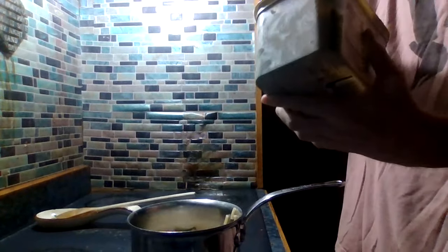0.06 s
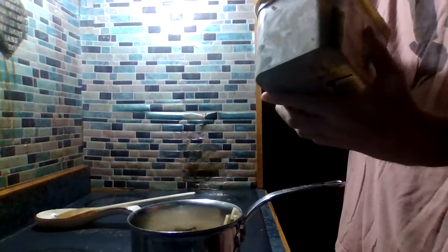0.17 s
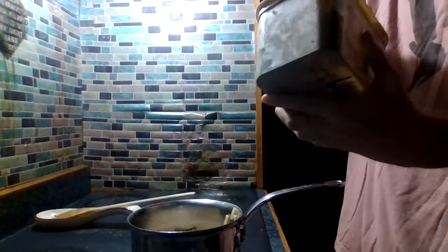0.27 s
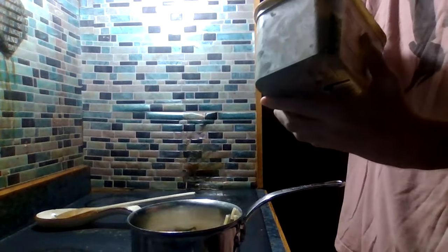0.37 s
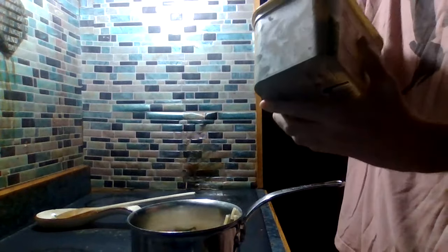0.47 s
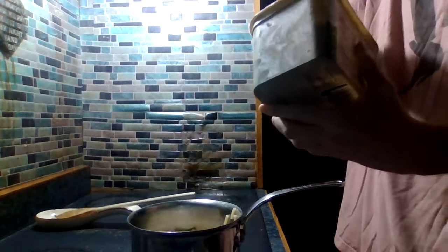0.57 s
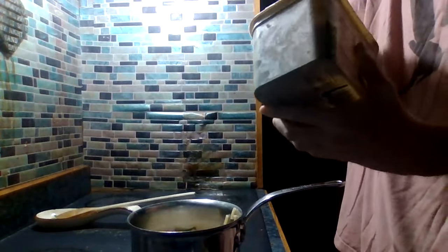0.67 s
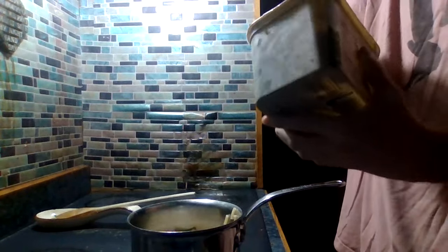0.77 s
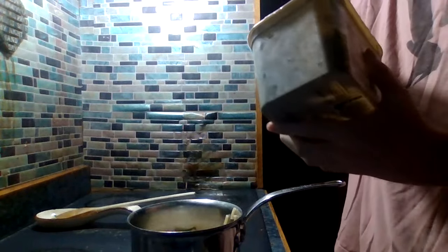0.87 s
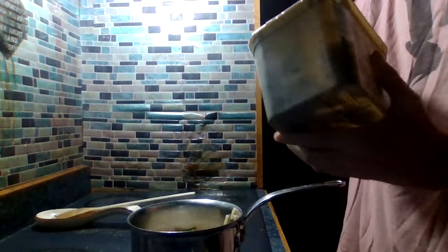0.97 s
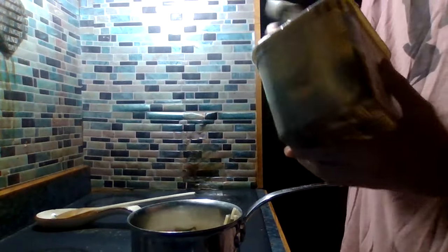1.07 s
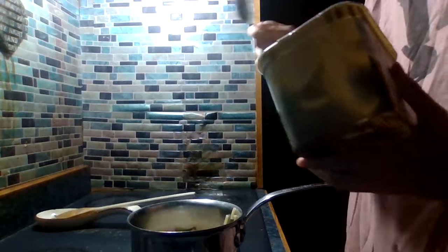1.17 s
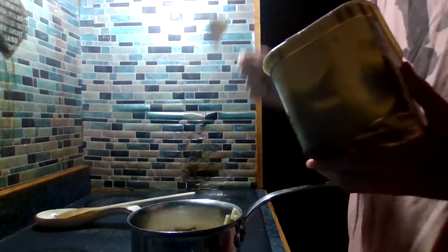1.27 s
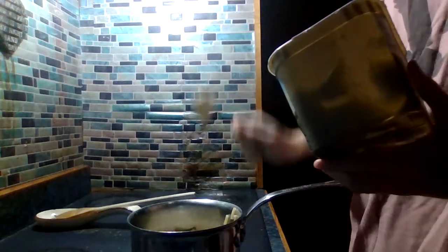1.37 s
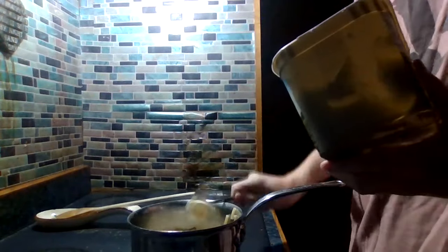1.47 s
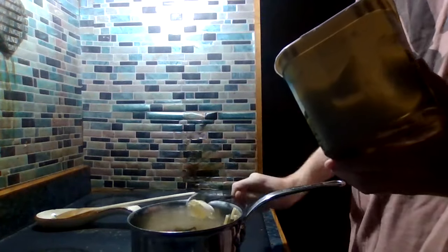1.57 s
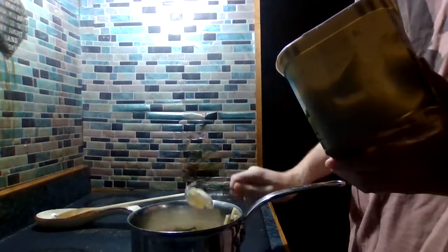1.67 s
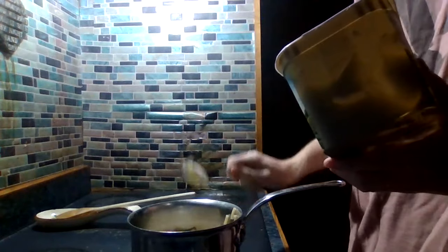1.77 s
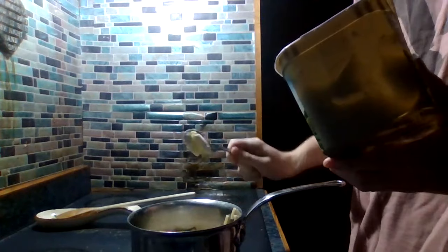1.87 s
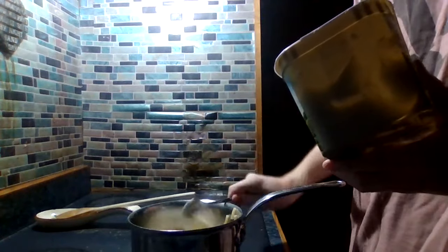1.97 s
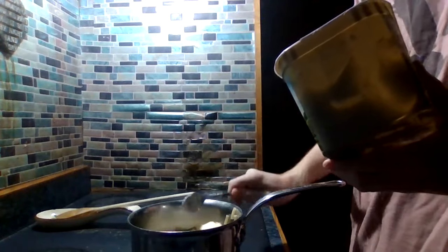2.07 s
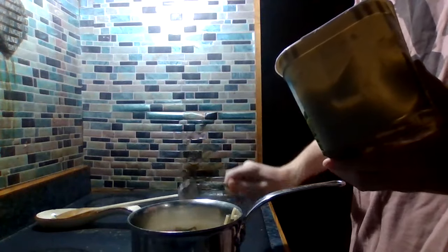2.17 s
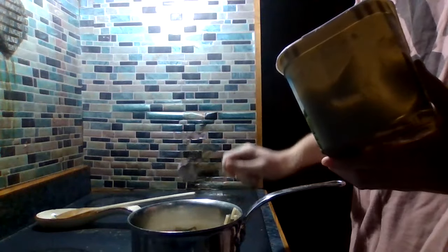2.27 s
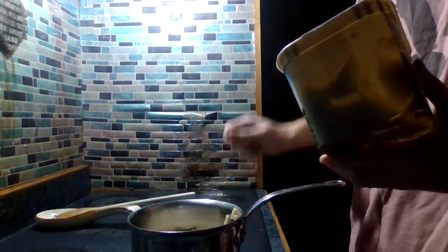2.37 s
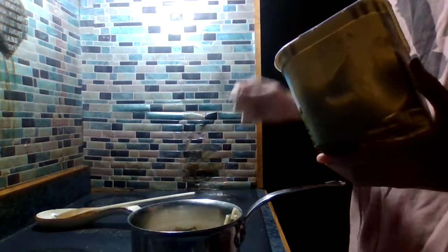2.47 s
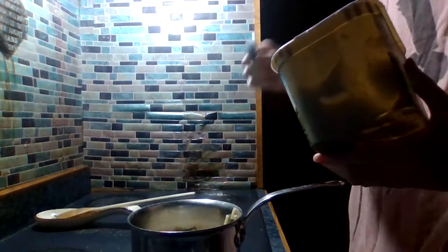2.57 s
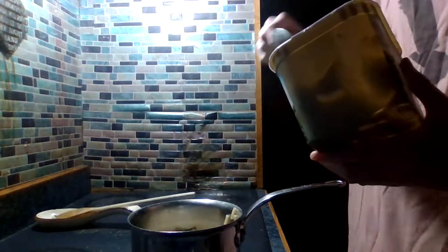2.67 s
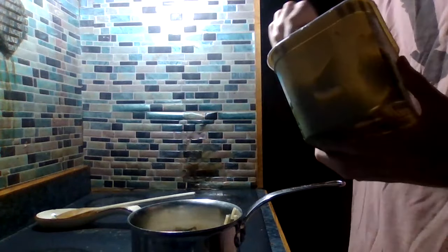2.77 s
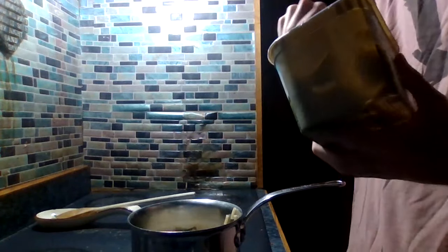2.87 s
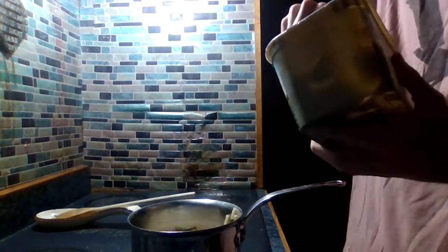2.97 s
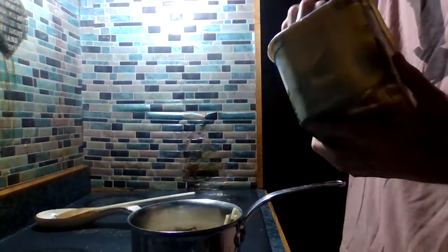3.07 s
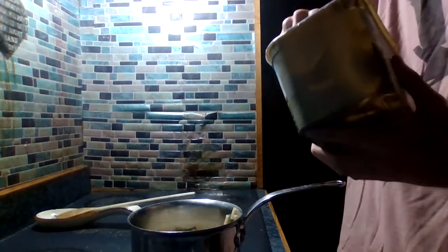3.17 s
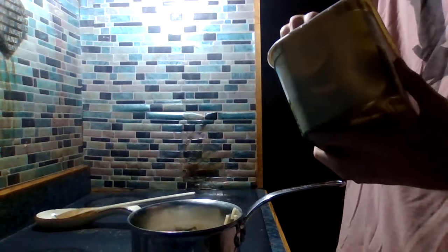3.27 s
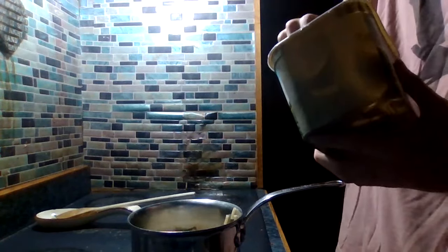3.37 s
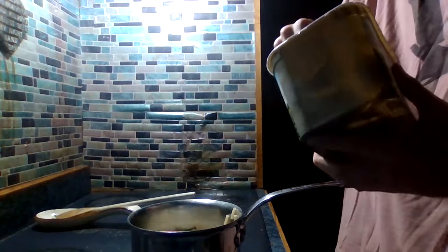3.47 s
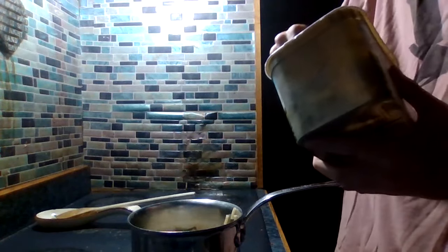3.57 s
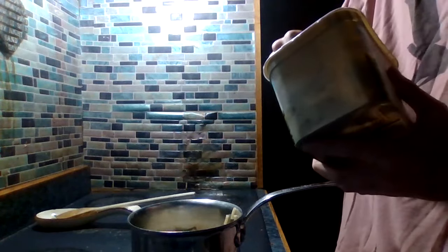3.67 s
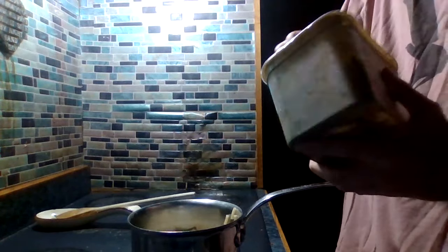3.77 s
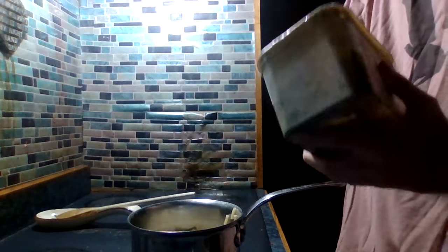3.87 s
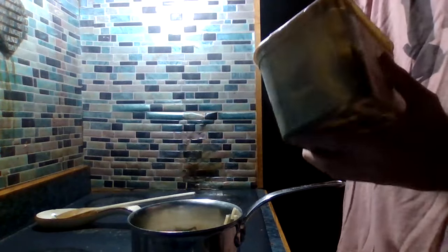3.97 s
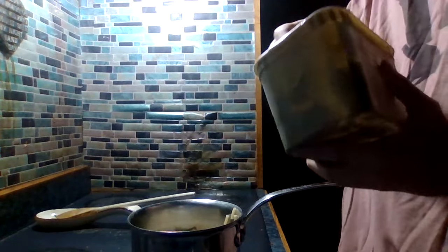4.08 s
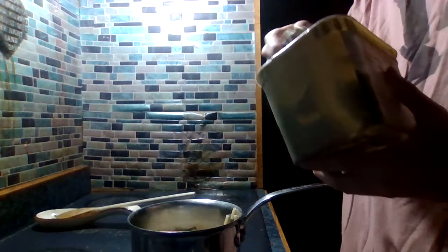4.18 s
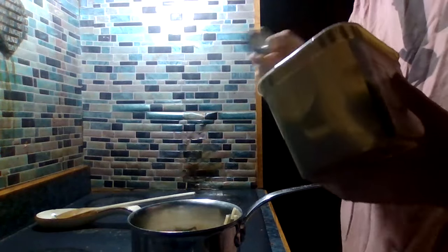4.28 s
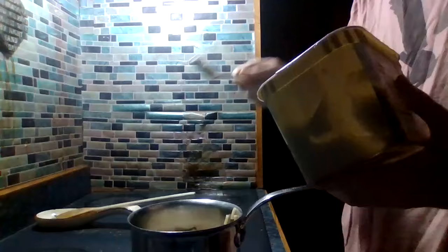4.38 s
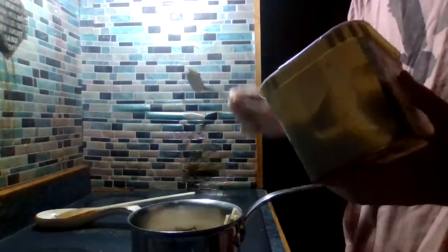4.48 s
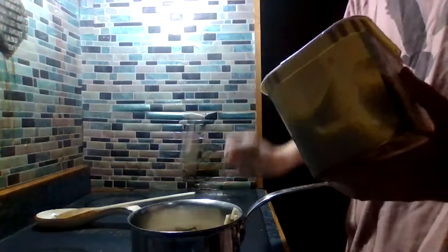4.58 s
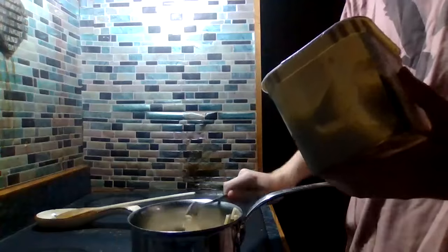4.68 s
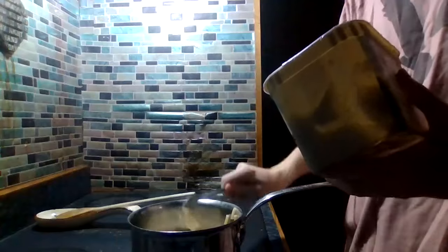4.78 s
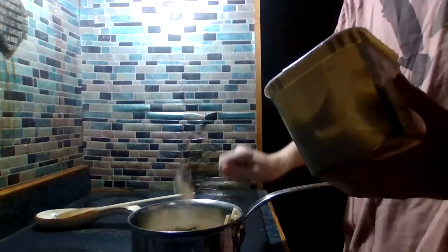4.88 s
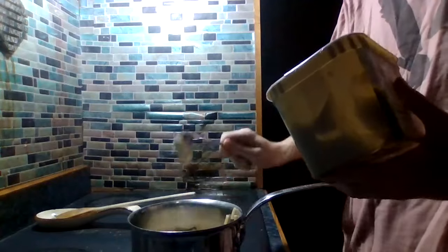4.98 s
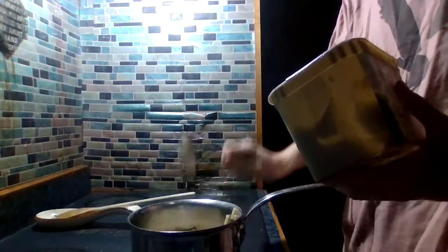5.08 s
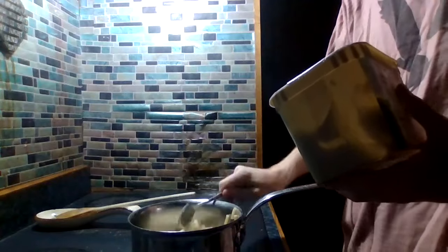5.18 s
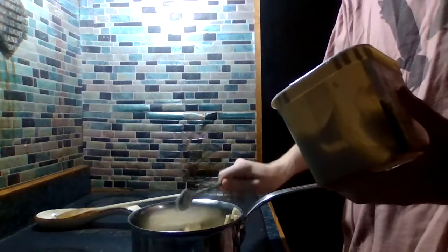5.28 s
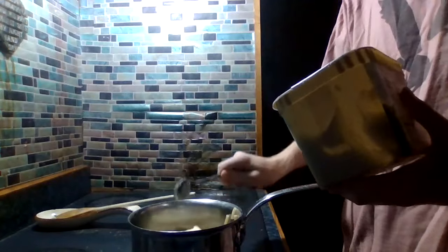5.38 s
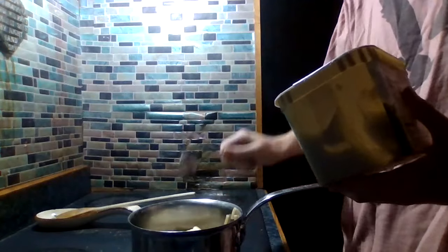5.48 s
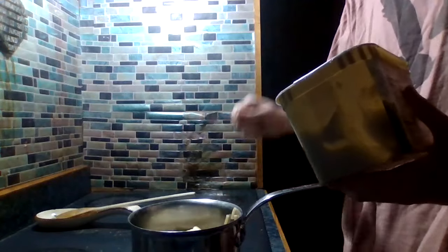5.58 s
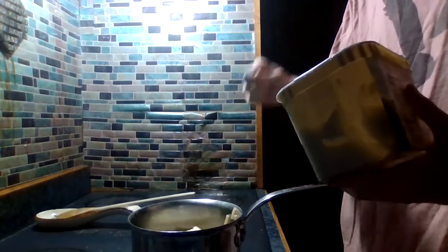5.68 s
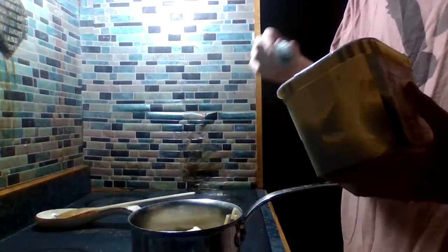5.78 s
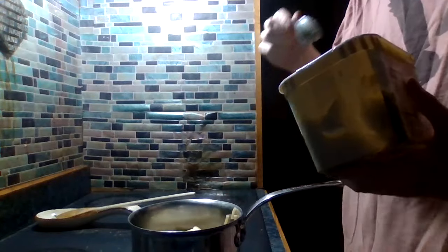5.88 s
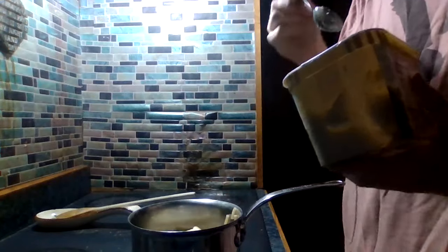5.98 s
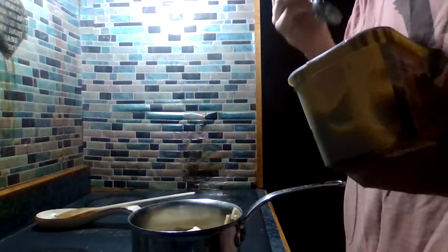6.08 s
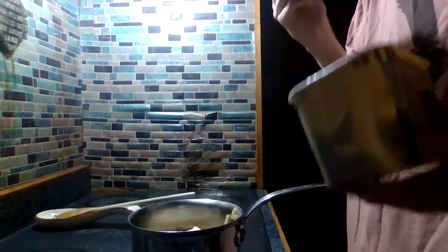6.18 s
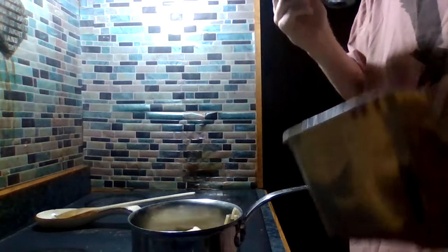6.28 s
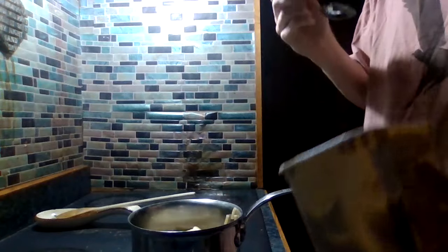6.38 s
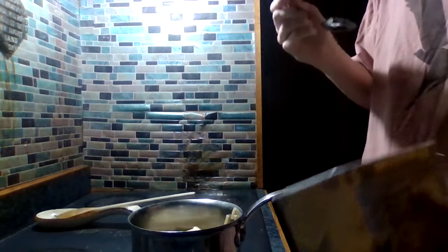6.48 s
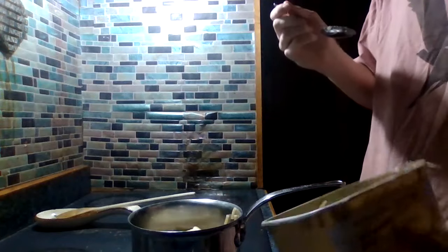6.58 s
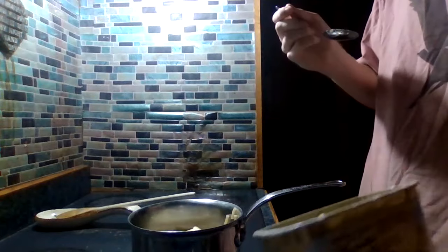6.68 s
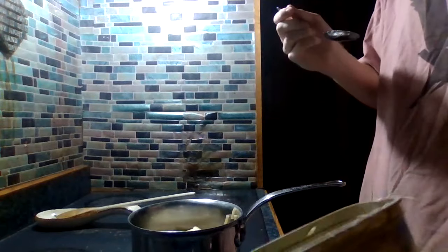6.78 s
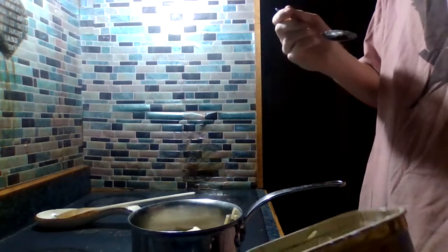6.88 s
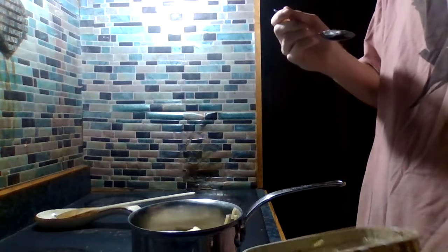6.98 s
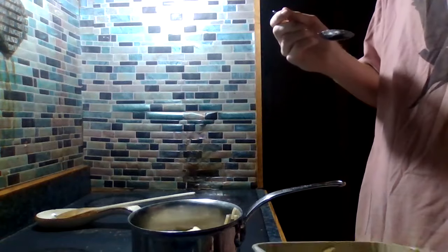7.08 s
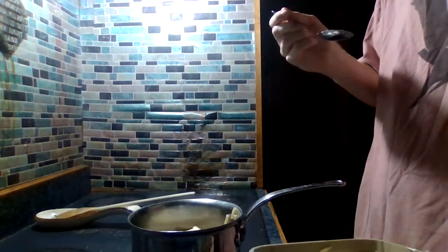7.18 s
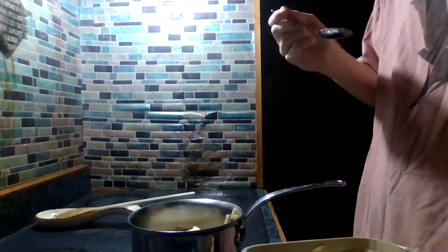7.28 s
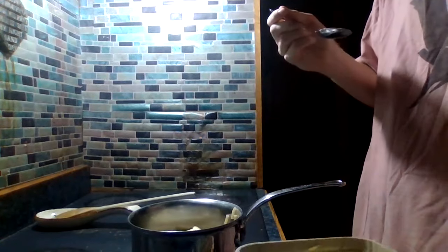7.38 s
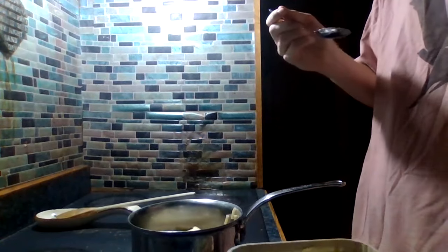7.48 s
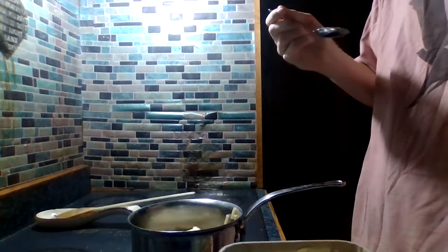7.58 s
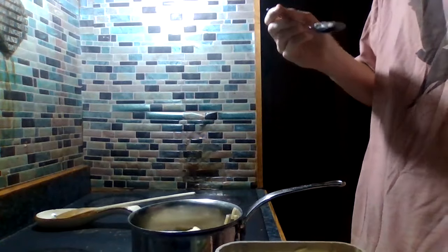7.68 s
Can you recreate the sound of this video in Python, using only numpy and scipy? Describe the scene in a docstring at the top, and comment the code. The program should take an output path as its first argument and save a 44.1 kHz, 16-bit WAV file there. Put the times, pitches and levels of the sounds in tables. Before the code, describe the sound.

A low rumble and hum run throughout in a small kitchen. During the first second a spoon scrapes faintly in a plastic tub, with one light tap. At about 1.5 and 2 seconds the steel spoon raps on the rim of a full saucepan: sharp, bright clanks with a short ring and a dull thud beneath, close enough to overload the microphone slightly. From 2.7 to 3.8 seconds come soft plastic knocks and brief scrapes, with a small damped clink at 3.5 seconds. Two more raps on the pan, louder than the first pair, ring out at 4.6 and 5.1 seconds. After a lull and a faint tap, the tub is set down on the counter with a hollow thud at 6.8 seconds and a sharper knock at 7.2. Light bumps and rubbing follow as it is pushed about, until around 7.7 seconds.

```python
"""Spoon, butter tub and saucepan

A steel spoon scrapes and knocks butter out of a plastic tub and is rapped four times on the rim of a full
steel saucepan, exciting crowds of metal modes hard enough to overload the microphones. Later the tub is
set down and pushed about on the counter. A small tiled kitchen reverberates over a low rumble and hum."""
import sys
import numpy as np
from scipy import signal
from scipy.fft import rfft, irfft, next_fast_len
from scipy.io import wavfile

SR = 44100
rng = np.random.default_rng(int(sys.argv[2]) if len(sys.argv) > 2 else 0)


def master(y):
    """Save y as 16-bit WAV."""
    cut = np.clip(np.atleast_2d(y).T, -1, 1)
    pcm = np.round(cut * 32767)  # scale
    wavfile.write(sys.argv[1], SR, pcm.astype(np.int16))


N = 340893

# rumble and hiss of the room: (frequency [Hz], relative spectral level [dB])
ROOM_SPECTRUM = [(12, -28.5), (20, 7.5), (32, 0), (91, -15), (107, -25.5), (170, -16), (229, -16.5),
                 (263, -28.5), (354, -24), (546, -33), (680, -30.5), (1330, -36), (4000, -43),
                 (9000, -47.5), (16000, -45.5)]
# humps of hum on that spectrum: (centre [Hz], width [Hz], height [dB])
HUM_PEAKS = [(41, 6.8, 5), (169.6, 16, 9.5), (351, 37, 5), (504, 73, 7)]
# spoon, fingers and tub rubbing:
# (peak time [s], hold [s], level [dB], rise [dB/s], fall [dB/s], tub body over surface [dB])
RUB_STROKES = [(0.0, 0.043, -52, 910, 350, -6), (0.5, .015, -55, 600, 204, -5),
               (0.548, .004, -45, 300, 350, -18), (0.69, .17, -53.5, 200, 450, -4),
               (2.74, 0.027, -59, 1500, 300, -6), (2.942, .005, -57.5, 900, 252, 2),
               (3.736, 0.0017, -28, 550, 800, -30), (3.7, 0.033, -56.5, 300, 300, 6),
               (3.8, .01, -44, 900, 250, -8), (4.215, .05, -75, 900, 250, -13),
               (4.424, .015, -61, 300, 450, -13), (6.624, 0.0048, -56, 250, 200, -8),
               (6.745, 0.15, -61, 700, 400, -10), (6.9, .005, -45, 1504.5, 232, 0),
               (7.07, 0.012, -56.5, 1500, 504, 8), (7.21, 0.0092, -69, 902, 200, 12),
               (7.28, 0.043, -64.5, 150, 197, 13), (7.35, 0.017, -61, 300, 499, 7),
               (7.4, 0.029, -51, 300, 300, -2), (7.48, 0.015, -53, 900, 200, -4),
               (7.565, 0.0071, -49, 200, 250, -1), (7.62, 0.072, -54, 200, 248, -10)]
# friction at the surfaces: (frequency [Hz], relative spectral level [dB])
FRICTION_SPECTRUM = [(1470, -39), (2500, -19), (3600, -10.5), (4310, -13.5), (4950, -8), (6760, -9.5),
                     (7360, -15), (16000, -5.5)]
# knocks on the tub: (time [s], body [dB], counter boom [dB], click [dB], contact cutoff [Hz],
# decay time factor [1])
TUB_KNOCKS = [(0.728, -41, -56, -46, 2520, 0.97), (2.739, -46.5, -80, -50, 1470, 0.66),
              (2.919, -44.5, -61, -74, 2000, 0.67), (3.113, -31.5, -47.5, -39.5, 1820, 0.58),
              (3.328, -69, -70, -53, 1470, .5), (3.513, -40.5, -64, -55, 2030, 1.7),
              (3.767, -26.5, -43, -37, 2900, 0.56), (3.782, -25.5, -54, -23, 2200, 0.83),
              (6.252, -42.5, -53, -55, 1760, 0.43), (6.816, -8, -31.5, -40, 903, 0.49),
              (6.849, -29.5, -43, -53, 1010, 1.7), (6.898, -43, -60, -38, 1000, 1.2),
              (7.078, -25, -35, -55, 890, 0.74), (7.170, -12, -29, -20, 3600, 0.36),
              (7.455, -22.5, -38, -26.5, 1880, 0.57), (7.556, -36.5, -44.5, -69, 2500, 0.81),
              (7.65, -48, -56, -41, 2000, 0.55), (7.716, -41, -60, -43, 2500, 0.68)]
# spoon on rim, with relative levels: (time [s], spoon [dB], upper bowl mode [dB], pan wall [dB],
# pan rim [dB], left bias jolt [1], right bias jolt [1])
RIM_RAPS = [(1.4815, -27, -34.5, -15, -19, 0.8, 0.24), (1.971, -21, -31, -12, -13.5, 0.05, 0.42),
            (4.631, -21.5, -18, -6.5, -15.5, 0.23, 0.57), (5.13, -18, -12, -6, -11.5, 0.39, 0.63)]

# clusters of close modes: (centre [Hz], width [Hz], relative level [dB], nominal t60 [s])
TUB_MODES = [(433, 360, 5, 0.19), (784, 200, 0.5, 0.17), (1270, 200, -11, 0.17), (2050, 1640, 0, 0.22),
             (2665, 950, 1.5, 0.046), (4540, 6300, 12, 0.091)]
COUNTER_MODES = [(59, 25, 6.5, 0.2), (129, 74, 1, 0.46)]
SPOON_BOWL_MODES = [(2020, 110, 0, .33), (2170, 460, 1, .31)]
UPPER_BOWL_MODES = [(2322, 75, 0, .37)]   # ring freely only when little butter clings to the spoon
SPOON_NECK_MODES = [(3385, 170, -8, .38), (4020, 440, -1.5, 0.38)]
SPOON_LONE_MODES = [(3768, 15, -12, .52), (5822, 30, -4, .3), (6100, 30, -2, .4), (6176, 25, -5, .37),
                    (6650, 50, -8, .35), (7320, 35, -8, .3), (8120, 35, -9, .25), (10160, 35, -11, .24)]   # narrow enough to stand out as beating tones
PAN_WALL_MODES = [(5080, 1000, -12, 0.41), (5610, 440, -3, 0.15), (6100, 680, -5.5, 0.44)]
PAN_RIM_MODES = [(6880, 890, -3.5, 0.37), (7380, 790, -3, .34), (8230, 380, -7.5, .3)]
PAN_EDGE_MODES = [(13400, 1200, -7, .22), (14600, 1300, -3, .2), (15500, 600, -3, .21)]
SHIMMER_MODES = [(9680, 1600, -3.5, 0.3), (11300, 1500, 2, 0.27)]   # high ringing of pan and spoon
THUD_MODES = [(91, 130, -1, 0.1), (302, 280, -2.5, 0.32), (468, 240, -1.5, 0.24), (877, 310, -1.5, 0.13),
              (1550, 240, 2, 0.042)]   # the full pan on the hob
CLINK_MODES = [(2820, 970, 4.5, 0.055), (3200, 260, -9, 0.16), (4010, 680, 3, 0.055), (3940, 140, -11, 0.2),
               (5670, 1100, -2.5, 0.068), (7150, 860, 1.5, 0.077), (9600, 4000, -5, 0.046),
               (12000, 1600, 0, 0.08), (15400, 900, -2, 0.1)]   # the spoon, damped by the hand

# likeness of the sound field at left and right: (frequency [Hz], correlation [1])
COHERENCE = [(60, 0.98), (380, 0.97), (950, 0.82), (2400, 0.033), (6000, 0.02), (15000, 0.022)]
# reverberation of the kitchen: (frequency [Hz], t60 [s])
REVERB_TIMES = [(100, 0.35), (500, .33), (2000, 0.26), (8000, .3), (16000, 0.39)]


def amp(db):
    """Amplitude ratio of a level in decibels."""
    return 10 ** (np.asarray(db) / 20)


def unit_rms(x):
    """Normalisation to unit mean power."""
    return x / np.sqrt(np.mean(x ** 2) + 1e-20)


def at_hz(points, hz):
    """Interpolation of a table on a logarithmic frequency axis."""
    frequencies, values = np.array(points).T
    return np.interp(np.log(np.maximum(hz, 1)), np.log(frequencies), values)


def decay(t, t60):
    """Exponential damping: 60 dB down after t60 seconds."""
    return np.exp(-np.log(1000) * t / np.maximum(t60, 1e-3))


def add(out, start_s, sound):
    """Superposition: a sound joins the mix at start_s."""
    i = round(start_s * SR)
    out[..., i:i + sound.shape[-1]] += sound[..., :N - i]


def stereo_noise(size, gain):
    """Partial coherence: noise coloured by gain(hz), alike at both sides only at low frequencies."""
    padded = next_fast_len(size, True)
    hz = np.arange(padded // 2 + 1) * SR / padded
    mid, side = rfft(rng.standard_normal((2, padded)))
    alike = at_hz(COHERENCE, hz)
    spectrum = np.sqrt(1 + alike) * mid + np.sqrt(1 - alike) * side * [[1], [-1]]
    return irfft(gain(hz) * spectrum, padded)[:, :size]


def mid_side(pair, side_db):
    """Sum and difference: left and right from a shared and a differing part."""
    return pair[0] + amp(side_db) * pair[1] * [[1], [-1]]


def drift(corner_hz, steps_per_s=40):
    """Random relaxation: low-passed noise wanders with a spread near 1."""
    steps = rng.standard_normal(int(N / SR * steps_per_s) + 2)
    pole = np.exp(-2 * np.pi * corner_hz / steps_per_s)
    wander = unit_rms(signal.lfilter([1], [1, -pole], steps))
    return np.interp(np.arange(N) / SR * steps_per_s, np.arange(len(steps)), wander)


def ring(clusters, t, channels=2, t60_factor=0.75, uneven_db=0, spacing_hz=44.43):
    """Modal overlap: modes too close to resolve ring as a decaying band of noise."""
    hz, out = np.arange(len(t) // 2 + 1) * SR / len(t), 0
    # some modes are struck harder than others
    excitation = amp(uneven_db * np.interp(hz / spacing_hz, np.arange(1200), rng.standard_normal(1200)))
    for centre_hz, width_hz, db, t60 in clusters:
        real, imaginary = rng.standard_normal((2, channels, len(hz)))
        spectrum = (real + 1j * imaginary) * excitation / (1 + (2 * (hz - centre_hz) / width_hz) ** 4)
        out = out + amp(db) * unit_rms(irfft(spectrum, len(t))) * decay(t, t60 * t60_factor)
    return out


def room_noise():
    """Narrow-band noise is heard as wavering hum amid rumble and hiss; the bass swells at random."""
    def colour(hz):
        hum_db = sum(db / (1 + (2 * (hz - centre) / width) ** 2) for centre, width, db in HUM_PEAKS)
        return amp(at_hz(ROOM_SPECTRUM, hz) + hum_db)
    air = amp(-40) * unit_rms(stereo_noise(N, colour))
    bass = signal.sosfilt(signal.butter(1, 300, fs=SR, output="sos"), air)
    return air + (amp(drift(corner_hz=1.5)) - 1) * bass


def tub_rubs():
    """Friction noise: dense uneven grains, bright from the surfaces, duller through the tub's modes."""
    def tub_response(hz):
        return sum(amp(db) * (centre / width) ** .5 / (1 + ((hz - centre) / width) ** 2)
                   for centre, width, db, _ in TUB_MODES[1:-1])
    t = np.arange(N) / SR
    grains = amp(2.5 * np.minimum(rng.exponential(1, N), 5)) * amp(1.5 * drift(corner_hz=15))
    bright = unit_rms(stereo_noise(N, lambda hz: amp(at_hz(FRICTION_SPECTRUM, hz))))
    dull = unit_rms(stereo_noise(N, tub_response))
    surface, body = np.zeros((2, N))
    for peak_s, hold_s, db, rise, fall, body_db in RUB_STROKES:
        stroke = amp(db - rise * np.maximum(peak_s - t, 0) - fall * np.maximum(t - peak_s - hold_s, 0))
        surface += stroke
        body += stroke * amp(body_db)
    return (surface * bright + body * dull) * unit_rms(grains)


def tub_knocks():
    """A soft contact is a low-pass filter on the tub's modes; the counter booms under a dry click."""
    out, t = np.zeros((2, N)), np.arange(SR // 4) / SR
    for start_s, body_db, boom_db, click_db, contact_hz, t60_factor in TUB_KNOCKS:
        body = ring(TUB_MODES, t, channels=1, t60_factor=t60_factor)[0] * (1 - decay(t, 6 / contact_hz))
        body = signal.sosfilt(signal.butter(2, contact_hz, fs=SR, output="sos"), body)
        crack_hz = 0.44 * contact_hz   # first contact: a sharp swing of about four cycles
        crack = np.sin(2 * np.pi * crack_hz * t) * decay(t, 4.24 / crack_hz)
        crack *= 1 - decay(t, 2.4 / crack_hz)
        plastic = body / np.abs(body).max() + amp(-1) * crack / np.abs(crack).max()
        boom = ring(COUNTER_MODES, t, channels=1)[0] * (1 - decay(t, 0.0099))
        click = np.diff(rng.standard_normal((2, len(t) + 1)))
        click *= decay(t, 0.0015) + amp(-4.5) * decay(t, 0.068)
        add(out, start_s, amp(body_db) * plastic + amp(boom_db) * boom + amp(click_db) * click)
    return out


def rim_raps(thud_db=-19.5, bounce_s=.05, bounce_db=-4):
    """Impulsive excitation: each blow sets all parts of pan and spoon into free vibration."""
    out, t = np.zeros((2, N)), np.arange(SR // 2) / SR
    for start_s, spoon_db, upper_db, wall_db, rim_db, *_ in RIM_RAPS:
        parts = ((SPOON_BOWL_MODES, spoon_db), (UPPER_BOWL_MODES, upper_db),
                 (SPOON_NECK_MODES, spoon_db + 1), (SPOON_LONE_MODES, spoon_db + 1.5),
                 (PAN_WALL_MODES, wall_db), (PAN_RIM_MODES, rim_db),
                 (PAN_EDGE_MODES, rim_db + 8.5), (SHIMMER_MODES, -16))
        metal = sum(amp(db) * ring(modes, t, t60_factor=0.91, uneven_db=3.5) for modes, db in parts)
        metal *= 1 - decay(t, 0.057)
        chatter = amp(-1) * rng.standard_normal((2, len(t))) * decay(t, 0.096)   # spoon rattles on rim
        add(out, start_s, mid_side(metal + chatter, side_db=-2) * (1 - decay(t, 0.02)))
        add(out, start_s, amp(thud_db) * pan_thud(t))
        bounce = signal.lfilter([.07], [1, -.93], pan_thud(t))   # duller: the pan rocks back onto the hob
        add(out, start_s + bounce_s, amp(thud_db + bounce_db) * bounce)
    return out


def pan_thud(t):
    """Long waves from the full pan's low modes reach both microphones nearly alike."""
    return mid_side(ring(THUD_MODES, t), side_db=-14.5)


def bias_jolts():
    """Overload recovery: at each rap the microphones' bias dips, then overshoots."""
    out, t = np.zeros((2, N)), np.arange(SR // 2) / SR
    dip = 1.2 * decay(t, .07) * (1 - decay(t, .004))
    overshoot = .5 * decay(t, .36) * (1 - decay(t, .07))
    for start_s, *_, left, right in RIM_RAPS:
        add(out, start_s, np.outer([left, right], overshoot - dip))
    return out


def spoon_clink():
    """Damped vibration: the spoon touches the tub's edge and the hand shortens its ring."""
    out, t = np.zeros((2, N)), np.arange(SR // 2) / SR
    add(out, start_s=3.510, sound=amp(-31.5) * ring(CLINK_MODES, t) * (1 - decay(t, 0.018)))
    return out


def kitchen_reverb(x, gap_s=.003):
    """Diffuse reflection from tiled walls: after a short gap each octave band decays at its own rate."""
    t, echo = np.arange(SR // 2) / SR, 0
    for centre_hz in 90 * 2. ** np.arange(8):
        band = stereo_noise(len(t), lambda hz: np.exp(-2 * np.log2(np.maximum(hz, 1) / centre_hz) ** 2))
        echo = echo + band * decay(t, at_hz(REVERB_TIMES, centre_hz))
    echo *= np.clip((t - gap_s) / 0.00069, 0, 1)
    return signal.fftconvolve(x, echo / np.sqrt(np.sum(echo ** 2) / 2), axes=1)[:, :N]


def scene(port_lag_s=7e-5):
    """Superposition of direct sound, reverberation, room noise and the jolts of the bias."""
    steel = rim_raps() + spoon_clink()
    tub = tub_knocks() * amp([[-.4], [.4]]) + tub_rubs()
    around = tub + kitchen_reverb(amp(-16.5) * steel + amp(-11.5) * tub) + room_noise()
    around[1] = np.roll(around[1], round(port_lag_s * SR))   # tub and room reach the left port first
    return amp(-3) * steel + around + bias_jolts()


def record(dry, port_hz=15100, port_width_hz=1100, cutoff_hz=15780):
    """Port resonance lifts the top octave; the input saturates, the top is cut and full scale clips."""
    radius, angle = np.exp(-np.pi * port_width_hz / SR), 2 * np.pi * port_hz / SR
    feedback = [1, -2 * radius * np.cos(angle), radius ** 2]
    resonance = signal.lfilter((1 - radius ** 2) / 2 * np.array([1, 0, -1]), feedback, dry)
    saturated = 1.302 * np.tanh((dry + amp(-4) * resonance) / 1.308)
    low_pass = signal.ellip(12, .5, 60, cutoff_hz, fs=SR, output="sos")
    return np.clip(signal.sosfilt(low_pass, saturated), -1, 1)


dry = scene()
out = record(dry)
master(out)
```